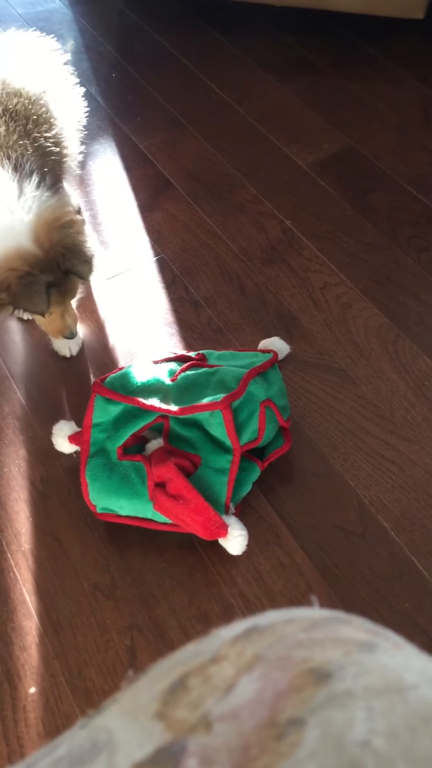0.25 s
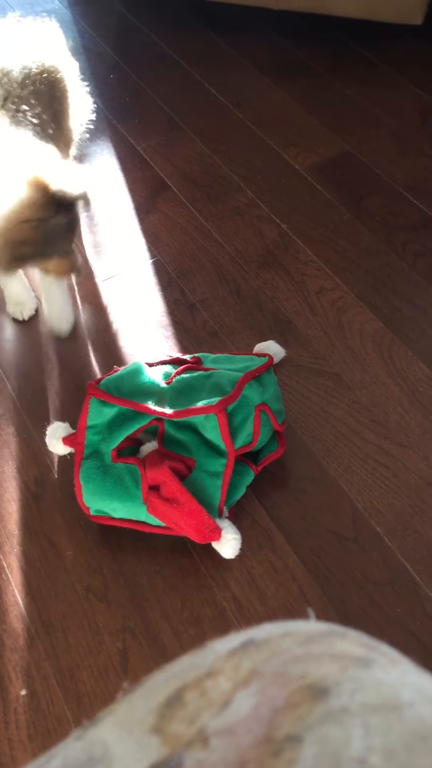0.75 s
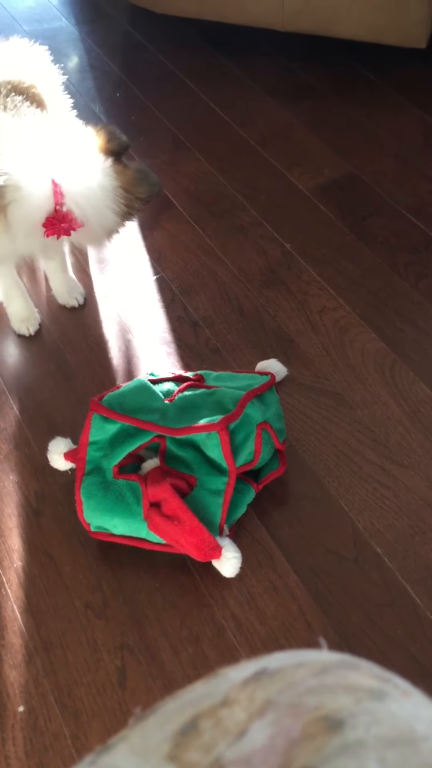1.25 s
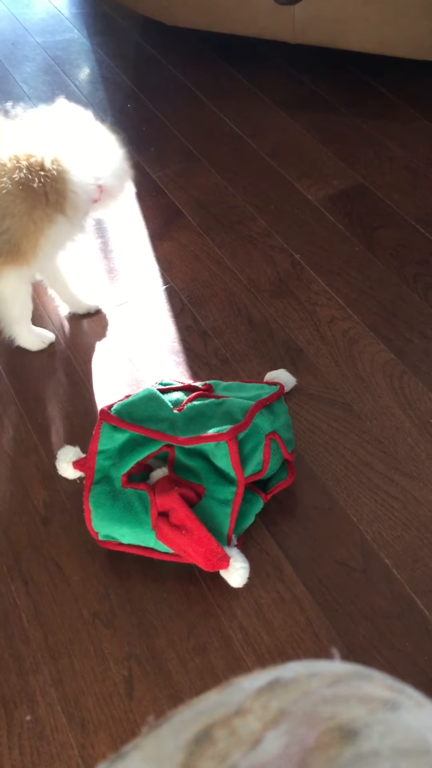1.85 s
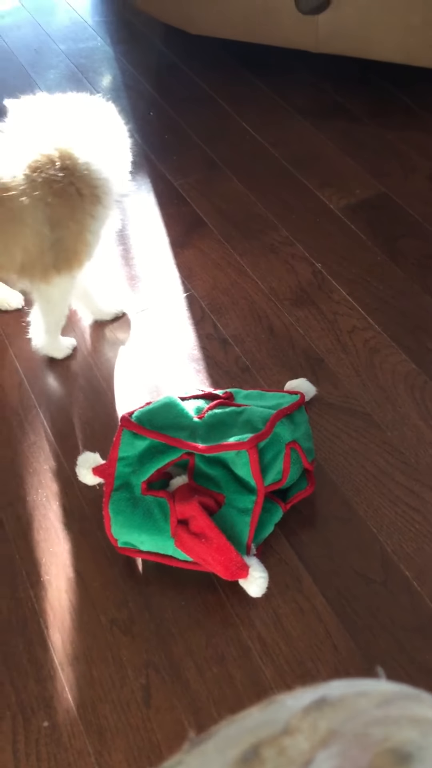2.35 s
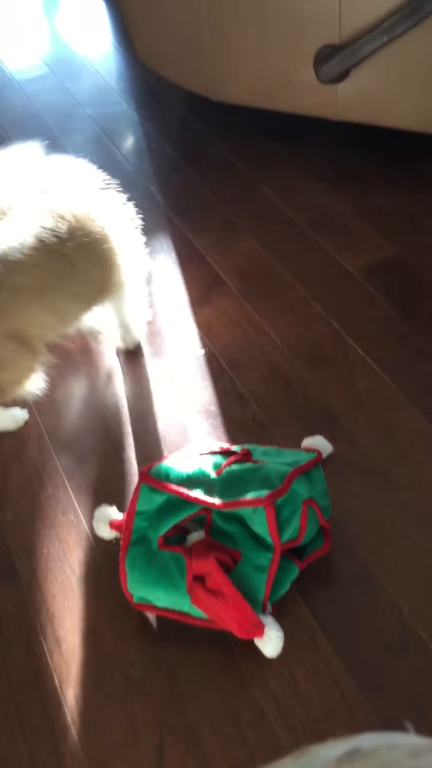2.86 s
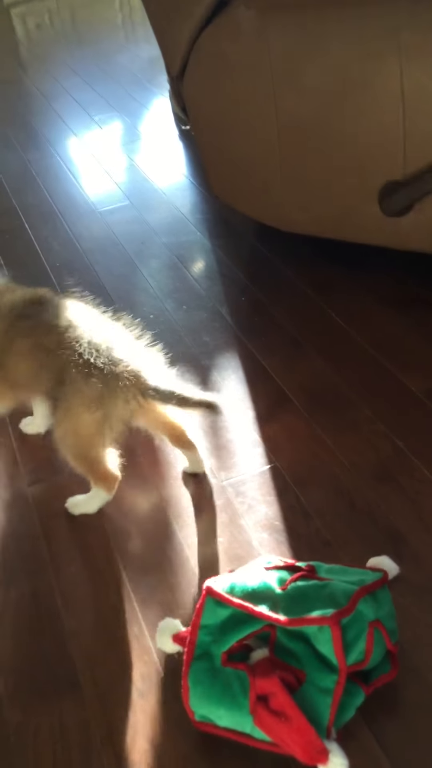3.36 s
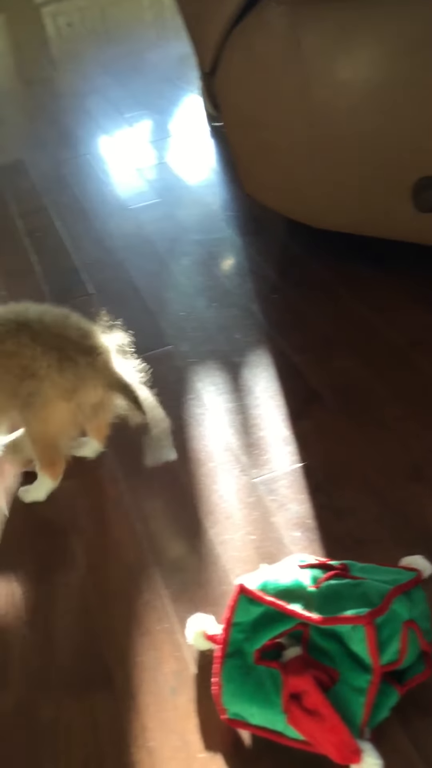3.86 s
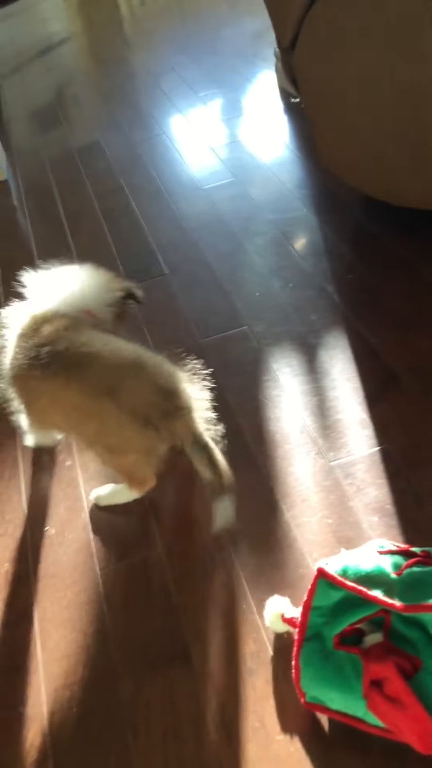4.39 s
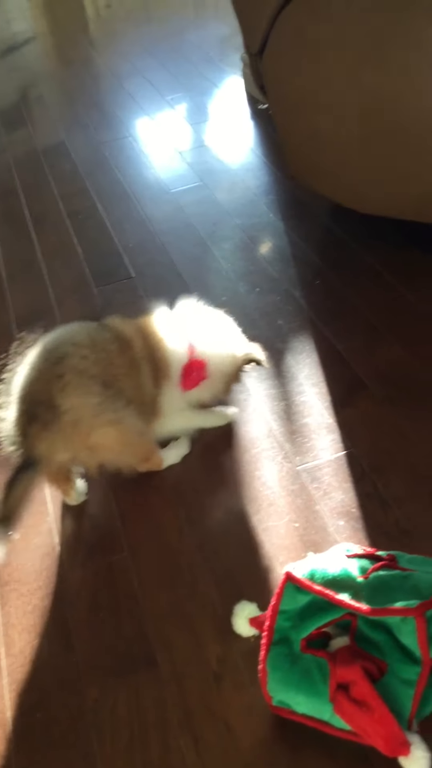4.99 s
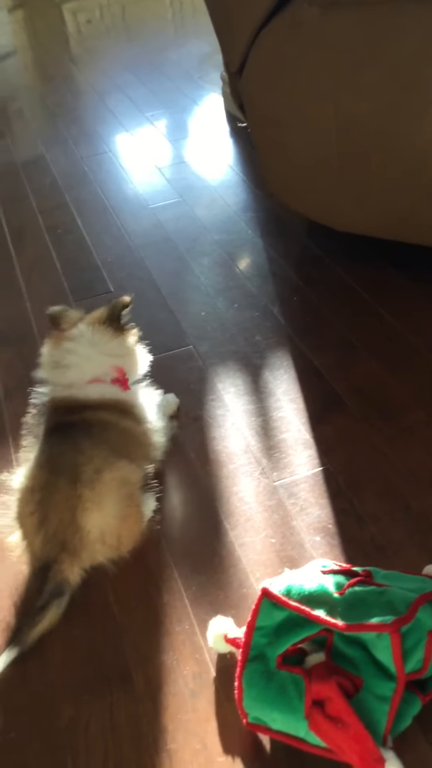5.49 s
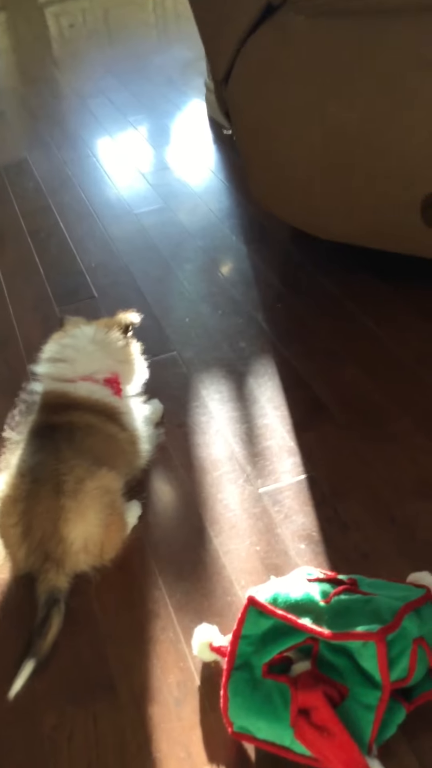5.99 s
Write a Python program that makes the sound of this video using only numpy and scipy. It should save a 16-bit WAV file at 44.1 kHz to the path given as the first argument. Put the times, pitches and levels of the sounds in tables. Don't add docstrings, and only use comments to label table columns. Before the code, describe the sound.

A low, unsteady house hum and very faint microphone hiss run throughout in a quiet, live room. At 0.4 s a tiny claw tick lands on hollow varnished wood, with barely audible touches after it and another tick with a soft thump near 1.0. From 1.67 to 1.86 a rapid patter of nails clicks, followed by a few lighter taps around 2.1. Sparse soft touches and steps continue at 2.6-2.9 and 3.5. From 3.8 to 4.05 claws scrabble with scuffs and tiny squeaks, ending in a sharp, loud knock. Light ticks at 4.4-4.6 lead to the strongest burst at 4.68-4.85: hard clacks, a skid and low paw thumps, with boards and walls ringing briefly. A small tap follows at 5.1 and a dull step at 5.5. At 5.63-5.76 a dry, juddering creak comes from the handheld phone's case, then a muffled cushion rustle swells near 6.0.

```python
import sys
import numpy as np
from scipy import signal
from scipy.fft import rfft, irfft, next_fast_len
from scipy.io import wavfile
from scipy.ndimage import uniform_filter1d, map_coordinates

SR = 44100
rng = np.random.default_rng(int(sys.argv[2]) if len(sys.argv) > 2 else 0)


def dump(signal):
    limited = np.clip(np.atleast_2d(signal).T, -1, 1)
    pcm = np.round(limited * 32767).astype(np.int16)
    wavfile.write(sys.argv[1], SR, pcm)


def invert_db(x):
    u = np.asarray(x, float) / 20
    return 10 ** u


N = 274958

# f/Hz, width/Hz, level/dB
BOARD_MODES = [(2104, 610, 3), (2495, 570, 9), (3300, 970, -4.5), (3930, 520, -9), (5740, 1900, -15)]


def unit(x):
    return x / np.sqrt(np.mean(x ** 2) + 1e-20)


def peak(x):
    return x / np.max(np.abs(x))


def add(track, s, sound):
    part = track[max(round(s * SR), 0):][:len(sound)]
    part += sound[:len(part)]


def along(points, hz):
    f, v = np.transpose(points)
    return np.interp(np.log(hz + 1), np.log(f + 1), v)


def filtered(x, response):
    m = next_fast_len(x.shape[-1] + min(x.shape[-1], 8192))
    spectrum = rfft(x, m) * response(np.fft.rfftfreq(m, 1 / SR))
    return irfft(spectrum, m)[..., :x.shape[-1]]


def modes(table):
    def response(f):
        total = 0
        for k, (c, w, db) in enumerate(table):
            ring = 1j * f * w / (c * c - f * f + 1j * f * w)
            total = total + (-1) ** k * invert_db(db) * ring
        return total
    return response


def soft(hz, edge_hz):
    return 1 / (1 + 1j * hz / edge_hz) ** 3


def wobble(rate):
    knots = rng.standard_normal(int(N * rate / SR) + 4)
    return map_coordinates(knots, [np.arange(N) * rate / SR])


def noise(spectrum, size=N):
    return unit(filtered(rng.standard_normal(size), lambda hz: invert_db(along(spectrum, hz))))


def claws():
    # t/s, peak level/dB, board
    # f/Hz, bare nail on wood/dB, nail f/Hz
    taps = [(0.402, -55.5, 1415, 4, 4560), (0.939, -63, 1380, -25, 3000), (0.989, -54, 1390, -9.5, 2340),
            (1.666, -47.5, 1070, -26, 3630), (1.679, -45, 1090, -5.5, 2330),
            (1.73, -37.5, 1400, -12.5, 2280), (1.799, -38, 1400, -4.5, 1800),
            (1.835, -39.5, 1070, -12, 1870), (1.861, -43, 1084, -25, 1870), (2.114, -51.5, 1240, -5, 2360),
            (2.139, -45.5, 1190, -10.5, 2370), (2.163, -46, 1380, -12, 2500),
            (2.901, -46, 1420, -10.5, 2460), (3.535, -53, 1080, 7, 2300), (3.569, -59, 1640, 3, 3160),
            (3.855, -41, 1160, 8.5, 3960), (3.889, -47, 1190, -19, 4300), (3.916, -45, 1204, -3, 5170),
            (4.046, -24.5, 1357, -9, 2530), (4.0485, -31, 1400, -5, 2000), (4.402, -54, 940, -18, 2960),
            (4.43, -49.5, 1280, -4.5, 4400), (4.505, -48, 1250, -9, 2900), (4.561, -45, 1290, 4, 3170),
            (4.682, -34.5, 1120, 0, 2500), (4.753, -21.5, 1140, -4, 2280), (4.793, -26.5, 1700, 5, 3540),
            (4.796, -31.5, 1720, 9, 2360), (4.801, -42.5, 1700, 9, 4140), (4.816, -40.5, 1590, 2.5, 2300),
            (5.104, -42.5, 1350, -13, 4200), (1.797, -46.5, 2300, 3, 4130), (4.806, -39, 1230, -2, 3620),
            (4.845, -42, 1730, 2, 2260), (3.905, -50, 1160, -6, 2410), (1.833, -65, 1380, -5, 2500),
            (1.842, -42, 1250, -26, 1900)]
    # t/s, peak level/dB, board f/Hz
    touches = [(0.604, -68, 1400), (0.692, -68, 1400), (2.069, -61.5, 1460), (2.585, -57, 360),
               (2.837, -60.5, 1670), (3.034, -80, 1100), (3.271, -60, 1400), (3.72, -64.5, 1170),
               (4.372, -56, 1250), (.405, -63, 800), (0.991, -57, 1100), (1.668, -55.5, 700),
               (1.733, -44, 1120), (1.837, -48.5, 690), (2.14, -46, 1626), (2.163, -55, 1076),
               (2.901, -55, 1130), (2.899, -52, 1590), (2.93, -54, 1400), (3.919, -43, 1750),
               (4.682, -36.5, 1660), (4.753, -34.5, 540), (5.105, -52, 804), (5.148, -53, 1210)]
    touch_edge_db, touch_nail_hz = -18, 2430
    out, echoes, t = np.zeros(N), np.zeros(N), np.arange(2048) / SR
    for s, db, hz, edge_db, nail_hz in taps + [(*touch, touch_edge_db, touch_nail_hz) for touch in touches]:
        hard = np.clip((db + 45.5 + edge_db) / 14, 0, 1)
        rise = 0.001625 * (1 - hard) + 0.00011
        chatter = rng.standard_normal((3, len(t))) * invert_db(-60 * t / 0.02) * (1 - np.exp(-(t / rise) ** 2))
        chatter[:, 12] += hard * np.array([8, 10, 4.5])
        chatter[0] += 0.9 * np.sin(2 * np.pi * hz * t) * np.exp(-(t / rise - 1) ** 2)

        wood = modes([(hz, 210 + 200 * (1 - hard), 0), (1.64 * hz, 260, -11)])
        plank = filtered(chatter[0], lambda f: wood(f) * soft(f, edge_hz=2850) * (f / (f - .62j * hz)) ** 3)
        pad = filtered(chatter[2], lambda f: modes([(779, 420, 0)])(f) ** 2)
        pad_db = -10 - 9 * hard
        board = peak(plank) + invert_db(pad_db) * peak(pad)

        upper = modes([(c, w, level + 0.089 * edge_db * (c > 3700)) for c, w, level in BOARD_MODES])
        nail = modes([(nail_hz, .14 * nail_hz, 4.5)])
        knock = filtered(chatter[1], lambda f: upper(f) * soft(f, edge_hz=6800) * f / (f - 1800j) + nail(f))

        crack = filtered(chatter[2], lambda f: (f / (f - 5000j)) ** 2 * soft(f, edge_hz=9600))
        crack_db = -19.5 + 1.64 * edge_db + 13 * hard
        tap = peak(board) + invert_db(edge_db) * peak(knock) + invert_db(crack_db) * peak(crack)
        tap = invert_db(db + 1.0) * tap
        add(out, s - 0.672 * rise, tap)
        add(echoes, s - 0.651 * rise, near(tap))
    return out, echoes


def near(x):
    # delay t/s, level/dB
    surfaces = [
        (.0025, -7.5),
        (.0055, -7),
        (.0085, -6.5),
        (0.012, -18.5),
        (0.0221, -9.5),
        (.026, -52),
    ]
    moved = [(s * (1 + .15 * rng.uniform(-1.055, 1) * (s < .01)), db) for s, db in surfaces]

    def response(hz):
        arrivals = sum(invert_db(db) * np.exp(-2j * np.pi * hz * s) for s, db in moved)
        return arrivals / (1 + 1j * hz / 3500) ** 2
    return filtered(np.pad(x, (0, len(x))), response)


def skids():
    # t/s, fall t/s, level/dB, tilt/dB per octave
    scuffs = [(0.938, 0.027, -69, -5.5), (1.672, 0.023, -58, -5.5), (1.93, 0.0033, -60, -6.5),
              (3.538, 0.0097, -57, -0.5), (3.573, 0.027, -61.5, -4.5), (3.815, 0.071, -65.5, -2.5),
              (3.83, 0.016, -46.5, 2), (3.857, 0.008, -38.5, -1.5), (3.91, 0.013, -49, -10),
              (3.977, 0.011, -59.5, -3), (4.253, 0.01, -69.5, -3.5), (4.51, 0.025, -58.5, -5),
              (4.691, 0.012, -42.5, -5.5), (4.709, 0.028, -50.5, -5.5), (5.107, 0.012, -57, -5),
              (5.148, 0.03, -69.5, -3), (5.439, 0.068, -65, -2)]
    # t/s, fall t/s, level/dB, tilt/dB per octave
    slides = [(0.403, 0.024, -66.5, -4.5), (3.777, 0.03, -67, -2), (4.401, 0.081, -69, -8),
              (4.563, 0.016, -44, -3), (4.731, 0.0075, -55, -5), (4.753, 0.0046, -39, -8.5),
              (4.798, 0.0062, -32, -6.5), (5.225, 0.085, -70, -2), (5.375, 0.036, -64.5, -3),
              (5.7, 0.018, -62.5, -16), (3.0, .12, -77, -1.5), (5.65, 0.34, -76.5, 0)]
    # f/Hz, level/dB
    pad_colour = [(600, -27), (1200, 4), (2500, -2.5), (4500, 2), (8000, -1), (12000, -0.5), (16000, -4)]
    out = np.zeros(N)
    strokes = [(0.6, *row) for row in scuffs] + [(0.94, *row) for row in slides]
    for share, s, fall, db, tilt_db in strokes:
        rise = share * fall
        t = np.arange(-round(.15 * SR), round(.25 * SR)) / SR
        stroke = np.exp(-np.where(t < 0, t / max(rise, 1e-3), t / max(fall, 1e-3)) ** 2)
        colour = [(hz, level + tilt_db * np.log2(hz / 5000)) for hz, level in pad_colour]
        catches = (rng.random(len(t)) < 500 / SR) * np.minimum(rng.exponential(0.8, len(t)), 1.6)
        grit = 1 + signal.lfilter([1], [1, -np.exp(-1 / (0.00023 * SR))], catches)
        add(out, s + t[0], invert_db(db) * stroke * unit(grit * noise(colour, size=len(t))))
    board = modes([(1250, 500, 0)] + BOARD_MODES)
    return filtered(patchy(out, depth_db=1.8), lambda hz: 1.067 + 0.13 * board(hz))


def patchy(x, depth_db):
    z = signal.stft(x, nperseg=256)[2]
    field = uniform_filter1d(rng.standard_normal(z.shape), size=5, axis=0)
    field = uniform_filter1d(field, size=12, axis=1)
    return signal.istft(z * invert_db(depth_db * unit(field)), nperseg=256)[1][:len(x)]


def squeaks():
    # t/s, half length t/s, level/dB, f/Hz
    drags = [(0.402, 0.0044, -72, 3570), (3.534, 0.0069, -67, 2400), (3.769, 0.0088, -70, 6900),
             (3.78, 0.009, -66, 4070), (3.786, .004, -61, 7000), (3.817, .004, -61, 3530),
             (3.826, 0.0039, -60, 4350), (3.833, .006, -55, 5500), (3.857, 0.0027, -47.5, 4190),
             (3.86, 0.0046, -47.5, 5500), (3.851, .004, -49, 1650), (4.044, 0.0034, -49, 2390),
             (4.049, 0.0036, -48, 5370), (1.798, 0.0015, -64, 4350), (2.141, 0.0072, -62, 2370),
             (1.835, 0.0024, -59, 2500), (3.842, .005, -56, 2190), (3.898, 0.0055, -55, 2300),
             (3.873, .004, -57, 3520), (3.927, .005, -61, 5140), (3.978, .005, -65, 8000),
             (4.426, 0.0047, -77, 2500), (4.44, 0.0052, -79, 4440), (4.511, 0.0061, -63.5, 2950),
             (4.512, .007, -66, 4500), (4.559, 0.0083, -51, 4580), (4.562, 0.0038, -43.5, 3170),
             (4.569, 0.0034, -51, 1510), (4.601, 0.013, -50, 1280), (4.692, .004, -53, 4760),
             (4.697, 0.0079, -43, 2560), (4.705, 0.0062, -51, 3840), (4.73, 0.0039, -64, 5450),
             (4.808, 0.0032, -39, 4080), (4.818, 0.0037, -39, 1640), (4.825, 0.009, -56, 4350),
             (4.844, .004, -40, 2360), (4.86, 0.0086, -47.5, 4350)]
    out, t = np.zeros(N), np.arange(-1024, 1024) / SR
    for s, half, db, hz in drags:
        band = filtered(rng.standard_normal(len(t)), lambda f: modes([(hz, 0.089 * hz, 0)])(f) ** 2)
        swell = np.exp(-(t / max(half, 1e-3)) ** 2)
        add(out, s + t[0], invert_db(db) * swell * unit(band))
    return out


def thumps():
    # t/s, peak level/dB, f/Hz
    paws = [
        (1, -50.5, 76),
        (2.588, -54.5, 199),
        (2.848, -54.5, 158),
        (3.546, -51.5, 127),
        (3.881, -49.5, 174.7),
        (4.043, -52.5, 141),
        (4.571, -70, 80.6),
        (4.739, -43.5, 134),
        (4.793, -38, 157.1),
        (5.489, -54.5, 159),
    ]
    out, t = np.zeros(N), np.arange(SR // 4) / SR
    for s, db, hz in paws:
        flex = np.sin(2 * np.pi * hz * t)
        flex += 0.34 * np.sin(2 * np.pi * 1.427 * hz * t + rng.uniform(0, 8.25))
        fade = invert_db(-60 * t / .12) * (1 - np.exp(-t / 0.0015))
        add(out, s, invert_db(db + 2.5) * peak(flex * fade))
    return out


def linger():
    # t/s, level/dB, f/Hz
    planks = [(0.404, -76, 1420), (0.992, -70.5, 1187), (1.681, -72, 1070), (1.732, -66, 1400),
              (1.802, -58, 1164), (1.836, -64, 1070), (2.141, -57, 1176), (2.164, -61, 1400),
              (2.9, -71, 1400), (2.901, -61, 1153), (3.54, -64, 1160), (3.861, -48, 1204),
              (3.903, -57, 1270), (4.047, -42, 1347), (4.048, -57.5, 2010), (4.431, -64, 1310),
              (4.566, -58, 1350), (4.683, -59, 1107), (4.753, -45, 1180), (4.796, -51.5, 1640),
              (4.797, -53.5, 2410), (4.821, -47.5, 1155), (5.104, -63, 1400)]
    t = np.arange(SR // 3) / SR
    rows = np.array(planks)
    ring = modes([(rows[:, 2:], 90, 0)])
    hums = filtered(rng.standard_normal((len(rows), len(t))), lambda f: ring(f) ** 2)
    fade = invert_db(-60 * t / .55) * (1 - np.exp(-t / 0.0061)) * np.cos(np.pi * t / t[-1] / 2)
    out = np.zeros(N)
    for (s, db), hum in zip(rows[:, :2], hums):
        add(out, s, invert_db(db) * fade * unit(hum))
    return out


def room(x, wet_db, size=2048):
    # f/Hz, level/dB
    walls = [(100, 10.5), (600, 5.5), (1150, -3), (1400, 1), (2000, -1.5), (4200, -1), (6000, 0.5),
             (14000, -2.5)]
    # f/Hz, t/s
    decay = [(100, 0.16), (300, 0.61), (1000, 0.6), (1800, 0.59), (4200, 0.61), (6000, 0.4), (12000, 0.33)]
    # f/Hz, width/Hz, level/dB
    hollow = [(1070, 31, 2), (1174, 26, 0), (1400, 40, -2.5), (1614, 17, 3), (1840, 30, -11),
              (2340, 21, -15), (2500, 120, -8.5), (4150, 40, -19), (4350, 190, -14)]
    out = np.zeros(N)
    for start in range(0, N, size):
        piece = x[start:start + size]
        if np.max(np.abs(piece)) < 1e-5:
            continue
        hz, t, z = signal.stft(rng.standard_normal(SR * 3 // 4), SR, nperseg=256)
        build = 1 - np.exp(-(t / .015) ** 2)
        fade_db = along(walls, hz)[:, None] - 60 * t / along(decay, hz)[:, None]
        tail = signal.istft(z * build * invert_db(fade_db), SR, nperseg=256)[1]
        add(out, start / SR, invert_db(wet_db) * signal.fftconvolve(piece, tail / np.linalg.norm(tail)))
    return filtered(out, lambda hz: 0.61 + 1.2 * modes(hollow)(hz))


def creak():
    # t/s, peak level/dB, low sway/dB, bright snap/dB
    slips = [
        (5.629, -60.5, 2, -16),
        (5.644, -65, -3, -25),
        (5.667, -53.5, -16, -24),
        (5.686, -48, -5, -23),
        (5.699, -40, -6, -13),
        (5.709, -40.5, -6.5, -20),
        (5.72, -42, -3, -22.5),
        (5.734, -47, -4, -23),
        (5.756, -46, -10, -25),
    ]
    # f/Hz, width/Hz, level/dB
    shell = [(560, 390, 8), (1240, 490, 6), (2300, 700, -11.5), (3160, 1000, -16), (10080, 7600, -41)]
    snap_s = .0023
    out, t = np.zeros(N), np.arange(2048) / SR
    late = np.maximum(t - snap_s, 0)
    for s, db, sway_db, snap_db in slips:
        judder = 0.45 * rng.standard_normal(len(t)) * (t < snap_s) * t / snap_s
        slip = judder - (np.arange(len(t)) == round(snap_s * SR))
        tick = rng.standard_normal(len(t)) * (t > snap_s - .0005) * invert_db(-60 * late / 0.0027)
        sway = np.sin(2 * np.pi * 190 * np.maximum(late - .0007, 0)) * invert_db(-60 * late / 0.025)
        sound = peak(filtered(slip, modes(shell))) + invert_db(sway_db) * peak(sway) + invert_db(snap_db) * peak(tick)
        add(out, s, invert_db(db + 4.0) * sound)
    return out


def swelling(rows):
    return invert_db(np.interp(np.arange(N) / SR, *np.transpose(rows)) + 1.3 * wobble(20))


def cushion():
    # t/s, level/dB
    rustle = [
        (5.7, -65),
        (5.86, -60.5),
        (5.97, -58.5),
        (6.06, -58.5),
        (6.14, -61),
        (6.24, -63.5),
    ]
    # f/Hz, level/dB
    cloth = [(150, 13.5), (350, -0.5), (600, -8), (1200, -9.5), (2200, -14.5), (4000, -22.5), (8000, -64)]
    # f/Hz, width/Hz, level/dB
    hollows = [(364, 59, 4.5), (710, 73, 5), (1070, 154, 0.5)]
    rubbing = filtered(noise(cloth), lambda hz: 1.8 + np.abs(modes(hollows)(hz)))
    return swelling(rustle) * unit(rubbing)


def body():
    # t/s, level/dB
    shifting = [
        (1.5, -81),
        (1.8, -66),
        (2.2, -77.5),
        (2.6, -72),
        (2.9, -102),
        (4.1, -69),
        (4.4, -65),
        (4.8, -55.5),
        (5.0, -82.5),
        (5.2, -100.5),
    ]
    # f/Hz, level/dB
    bulk = [(90, -2), (200, 2.5), (350, -4), (700, -16), (1100, -32)]
    return swelling(shifting) * noise(bulk)


def house_hum():
    # f/Hz, level/dB
    colour = [(22, -65), (42, -8), (60, 8), (172, 2), (254, -12), (480, -48.5), (620, -43), (1060, -120)]
    return invert_db(-64 + 0.27 * wobble(2.97) + 3.0 * wobble(20)) * noise(colour)


def microphone_hiss():
    # f/Hz, level/dB
    colour = [(360, -28), (620, -0.5), (1290, -38), (1920, -12), (4970, -8.5), (7470, -14), (8560, -11),
              (16000, -18.5)]
    return invert_db(-77.5 + .4 * wobble(1.3)) * noise(colour)


def scene():
    taps, echoes = claws()
    drag = skids() + squeaks()
    weight = thumps()
    wet = room(taps + drag + 0.68 * weight, wet_db=-7.0)
    floor = taps + echoes + drag + weight + wet + linger()
    background = cushion() + body() + house_hum() + microphone_hiss()
    return (floor + creak() + background)[None]


def low_pass(x):
    return signal.sosfilt(signal.butter(12, 16480, fs=SR, output="sos"), x)


def record(dry):
    def response(hz):
        bass_cut = (hz / (hz - 40j)) ** 2
        return bass_cut * np.where(hz < 15850, 1, invert_db(-18)) * (hz < 16480)
    return low_pass(filtered(dry, response))


dry = scene()
out = record(dry)
dump(out)
```